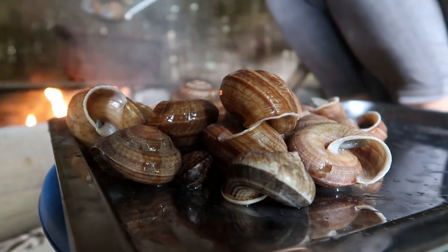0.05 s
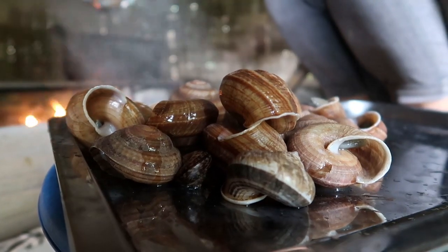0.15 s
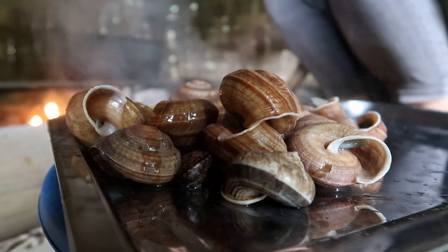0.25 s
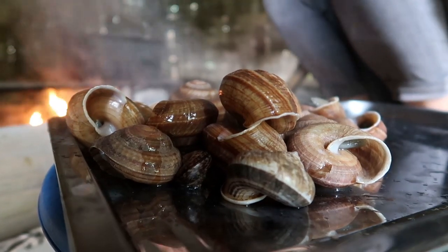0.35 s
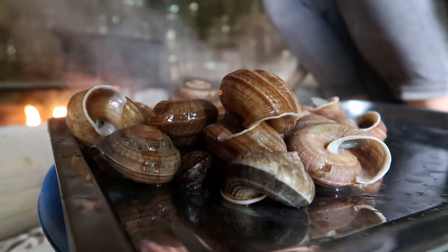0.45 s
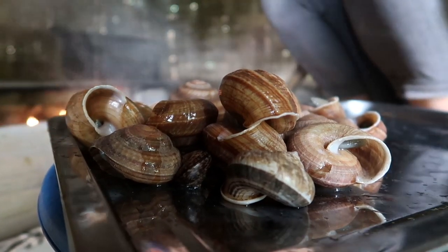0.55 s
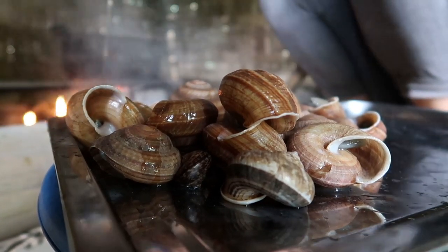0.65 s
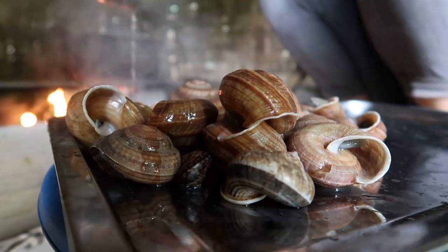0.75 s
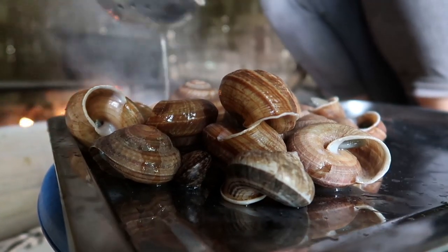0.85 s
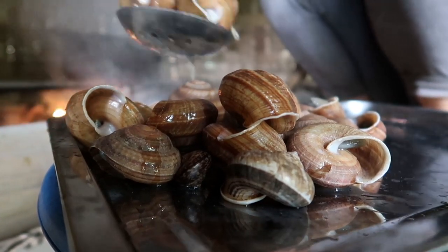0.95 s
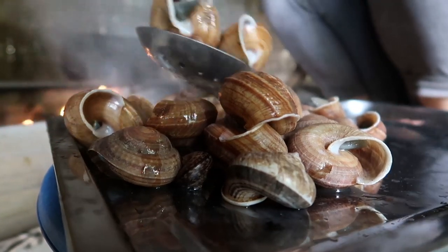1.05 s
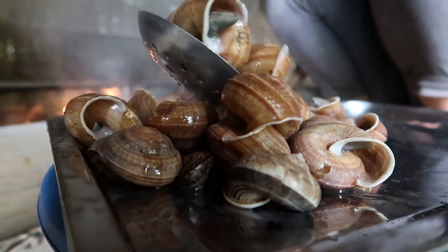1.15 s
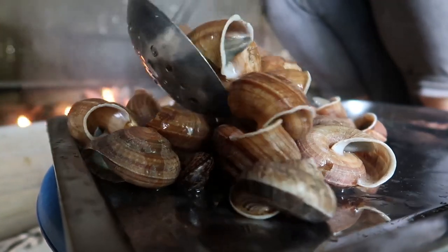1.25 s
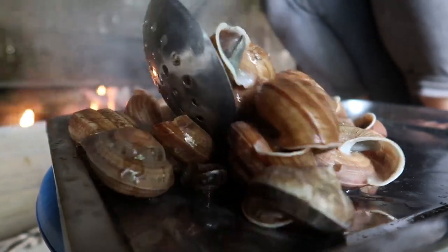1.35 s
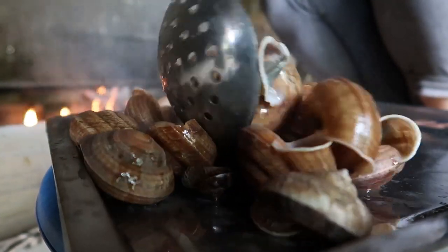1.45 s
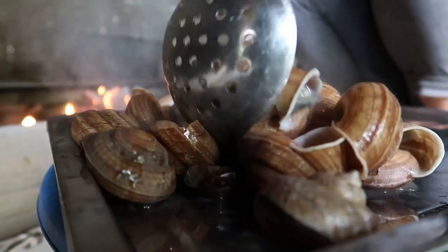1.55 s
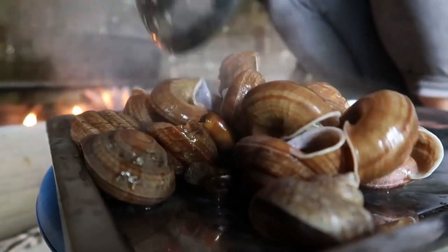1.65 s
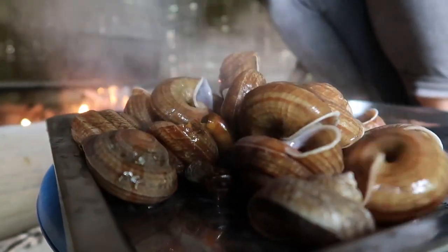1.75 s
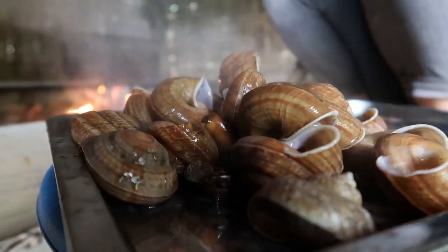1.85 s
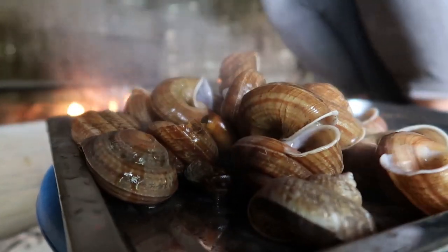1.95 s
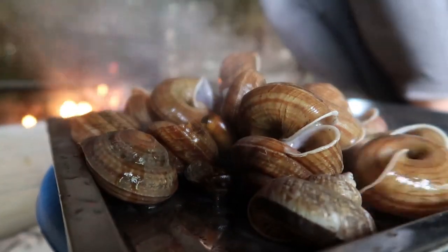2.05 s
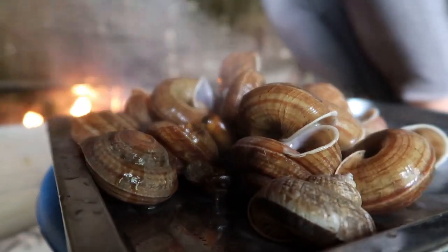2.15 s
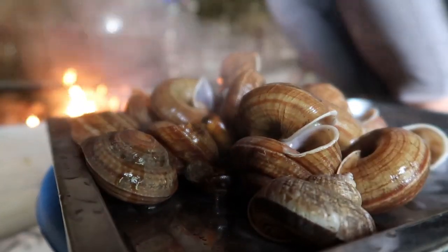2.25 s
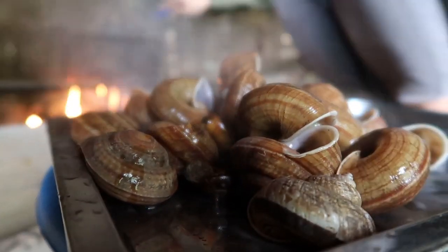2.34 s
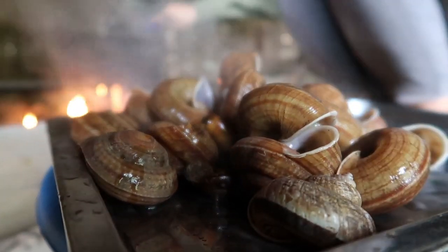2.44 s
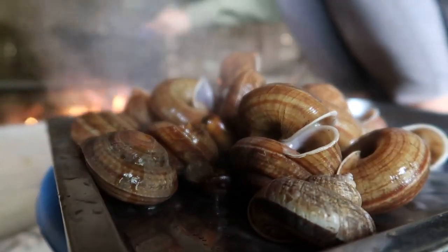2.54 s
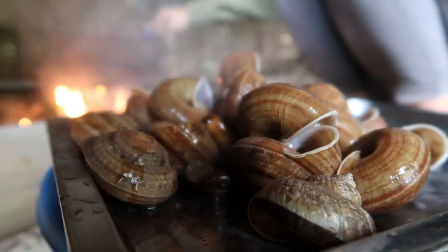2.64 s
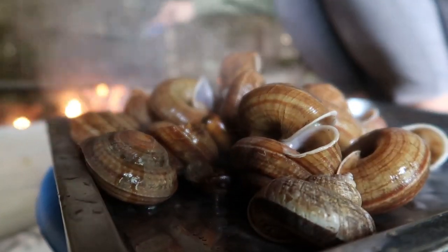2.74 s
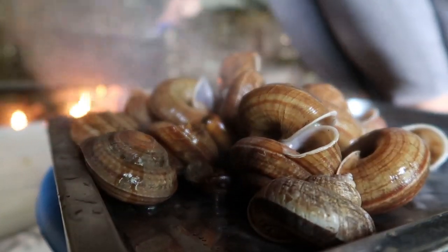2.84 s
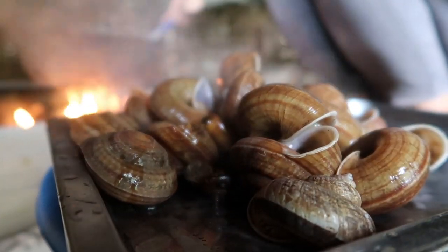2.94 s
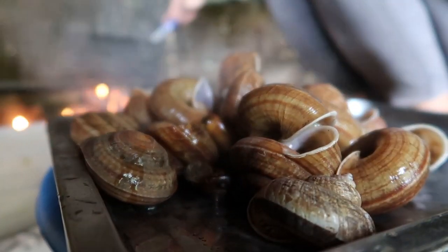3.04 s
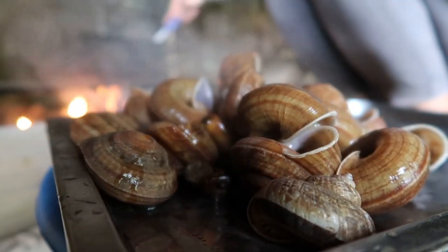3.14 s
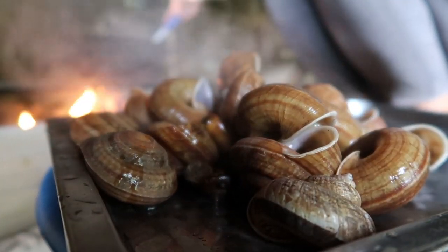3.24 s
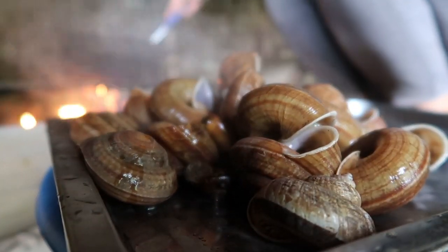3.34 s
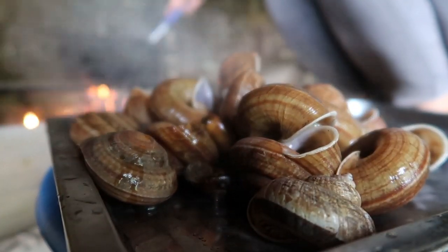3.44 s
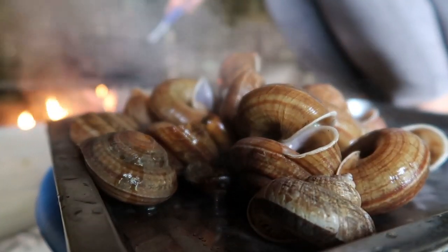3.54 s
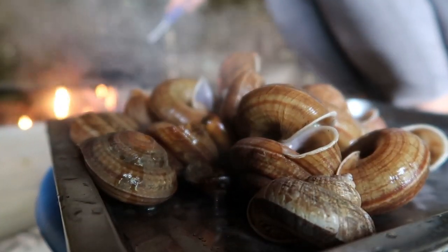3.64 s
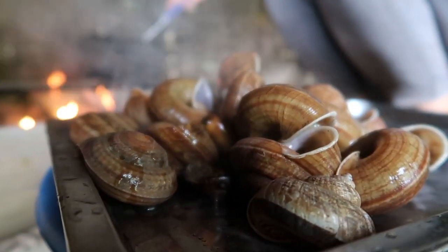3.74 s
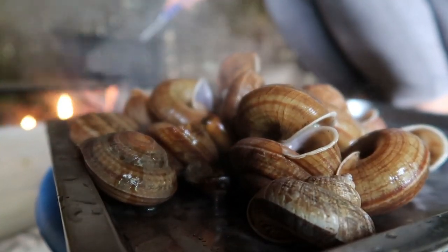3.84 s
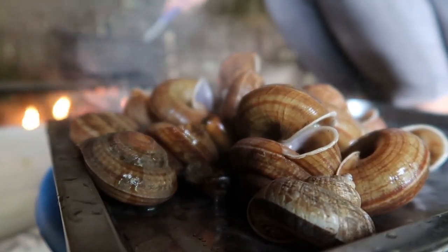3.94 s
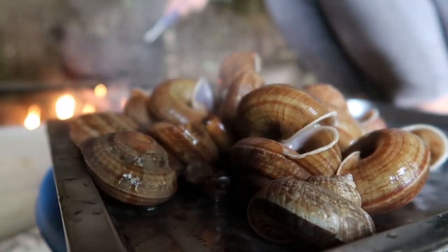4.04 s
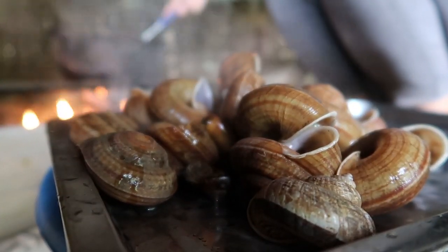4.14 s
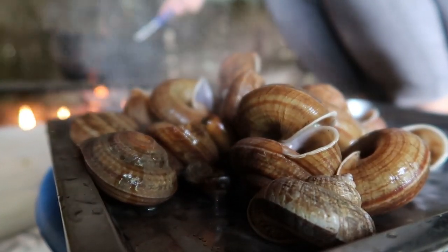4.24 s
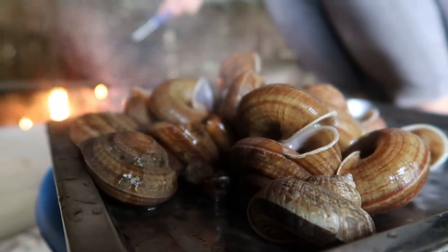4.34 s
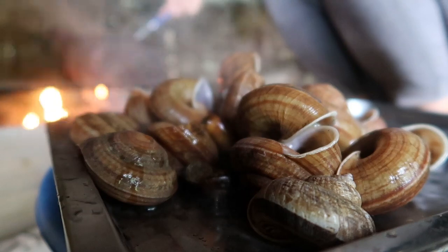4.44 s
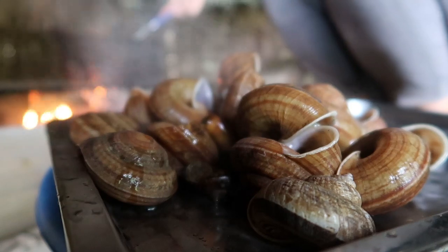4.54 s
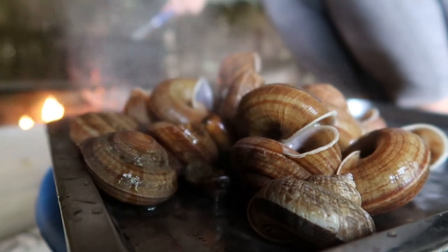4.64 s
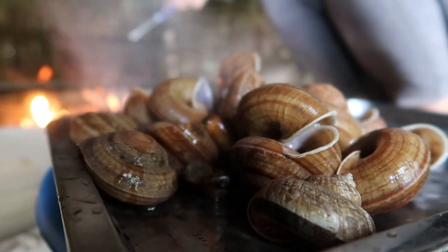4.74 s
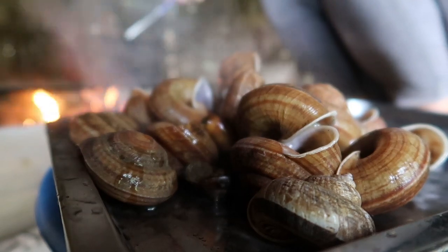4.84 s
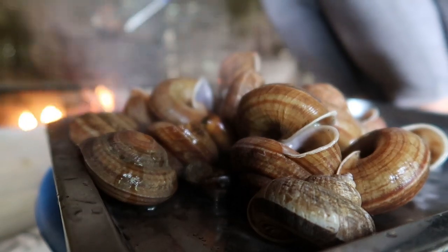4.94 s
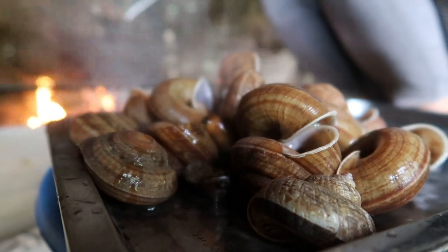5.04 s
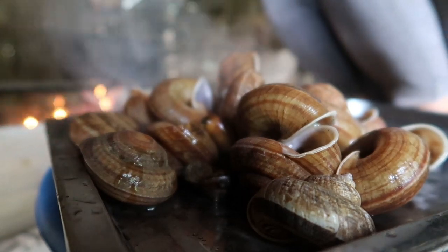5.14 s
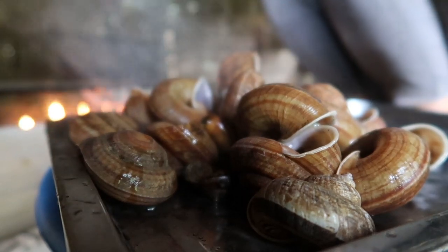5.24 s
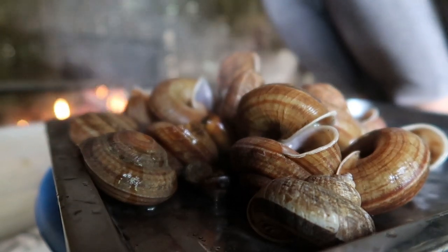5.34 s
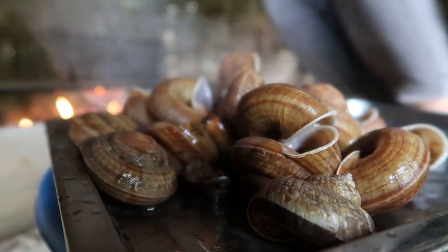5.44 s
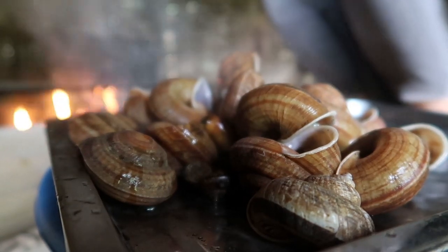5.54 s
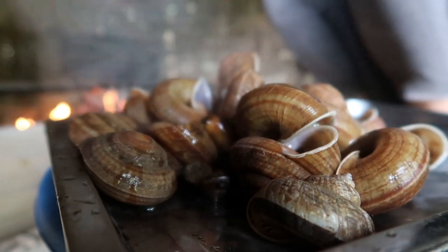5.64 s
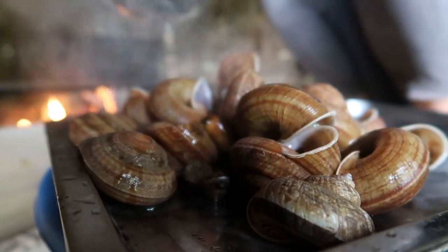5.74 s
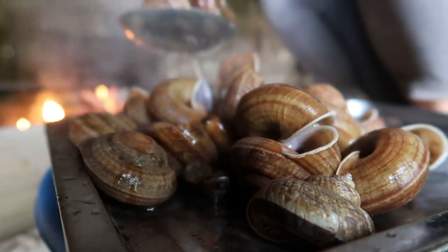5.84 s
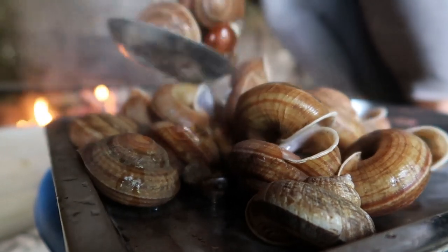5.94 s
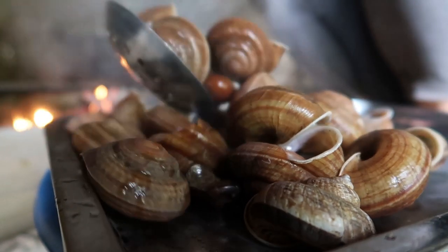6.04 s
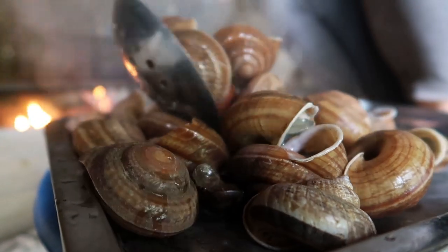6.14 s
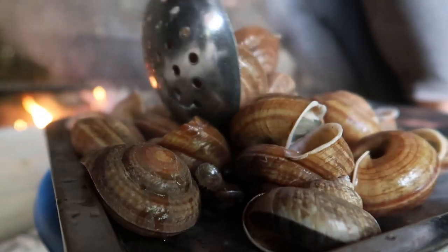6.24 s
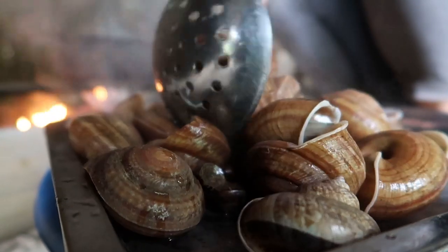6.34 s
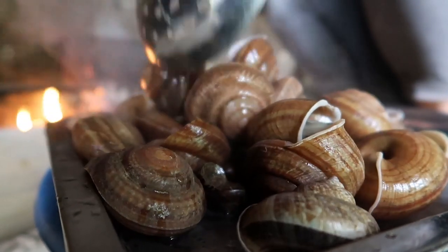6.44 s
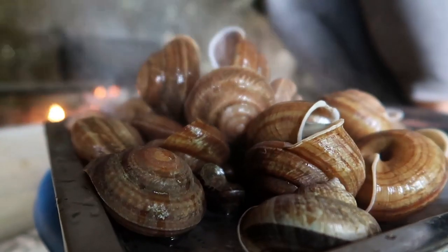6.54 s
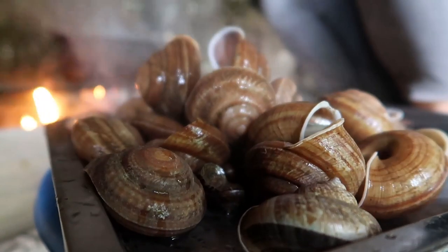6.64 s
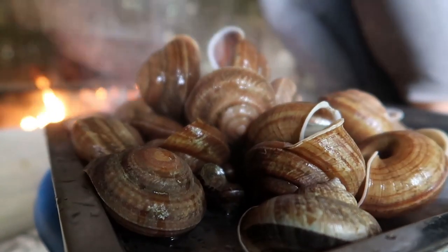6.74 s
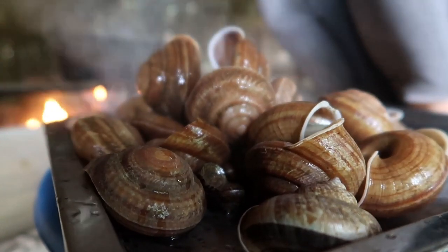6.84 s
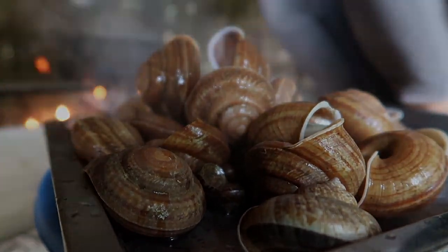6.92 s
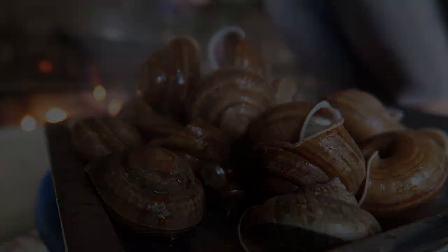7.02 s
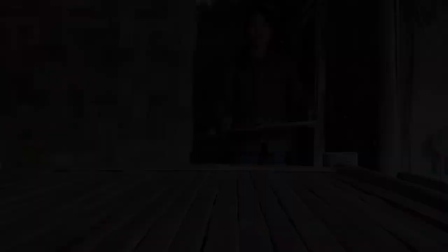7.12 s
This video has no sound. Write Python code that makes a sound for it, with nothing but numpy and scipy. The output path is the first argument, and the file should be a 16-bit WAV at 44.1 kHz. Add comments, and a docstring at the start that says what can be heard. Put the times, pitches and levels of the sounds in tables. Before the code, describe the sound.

Shells tumble from a metal spoon onto a tray with thumps and hollow clicks, twice, separated by distant pot stirring amid insect drone.

```python
"""Two clattering pours of cooked snail shells on a steel tray close by, with spoon work in a pot between them.
Each pour opens with a hard thump; shells knock, click and ring hollow, then settle in sparse rolls.
Further off the spoon knocks, scrapes and stirs; all round, filtered noise and wavering sines buzz as insects.
Contacts are noise bursts through resonances plus damped sines; nearby walls answer them.
An automatic gain ducks everything after loud sound, so the insects sink and creep back."""
import sys
import numpy as np
from scipy import signal
from scipy.fft import rfft, irfft, next_fast_len
from scipy.io import wavfile
from scipy.ndimage import uniform_filter1d, map_coordinates

SR = 44100
rng = np.random.default_rng(int(sys.argv[2]) if len(sys.argv) > 2 else 0)


def unload_wav(signal):
    """Save mono or channel-first audio to the path in sys.argv[1] as 16-bit WAV at rate SR, clipped to [-1, 1]."""
    wavfile.write(
        sys.argv[1],
        SR,
        np.round(np.clip(np.atleast_2d(signal).T, -1, 1) * 32767).astype(np.int16),
    )


N = 316701
SIZE = 2 * next_fast_len(N // 2 + SR // 4)
HZ = np.fft.rfftfreq(SIZE, 1 / SR)

# hard single strikes on the tray, by the loaded spoon or one shell; levels are relative:
# t/s, thump/dB, snap/dB, crack/dB, crack f/Hz, struck shell's crack/dB, its f/Hz, lean to the left (side/mid)
HARD_STRIKES = [(1.139, 1, -19, -9, 2360, -13, 3580, -0.56), (1.756, -7, -15, 1.5, 3070, 3, 3210, -0.098),
                (1.824, -2, -8.5, -11, 2730, -2, 1220, -0.61), (2.2604, -21, -2, 0.5, 1560, -6, 3020, -1.2),
                (5.9898, -1.5, -2, 6, 2770, -11, 886, 0.099)]
# air in a shell's mouth: multiple of the note, relative level/dB, t60/s
MOUTH_MODES = [(1, 0.5, 0.036), (1.47, -15, 0.037)]
# wall of a shell: multiple of the pitch, relative level/dB, t60/s
WALL_MODES = [(.8, -12.5, 0.024), (1, 2.5, 0.02), (1.33, -11, 0.018), (1.9, -40, 0.014)]


def amp(db):
    """Decibels to gain."""
    return 10 ** (np.asarray(db) / 20)


def unit(x):
    """Each row at rms 1."""
    return x / np.sqrt(np.mean(x ** 2, axis=-1, keepdims=True) + 1e-20)


def along(points, hz):
    """Read (Hz, value) points on a log frequency axis."""
    f, v = np.transpose(points)
    return np.interp(np.log(hz + 1), np.log(f + 1), v)


def fade(t, t60):
    """A decay of 60 dB in t60 seconds."""
    return np.exp(-np.log(1000) * t / np.maximum(t60, 1e-3))


def wobble(rate):
    """A smooth random curve, rate knots a second."""
    knots = rng.standard_normal(int(N * rate / SR) + 4)
    return map_coordinates(knots, [np.arange(N) * rate / SR])


def add(track, s, sound):
    """Mix a sound into a track at time s."""
    part = track[..., round(s * SR):][..., :sound.shape[-1]]
    part += sound[..., :part.shape[-1]]


def filtered(x, response):
    """A signal through a frequency response."""
    return irfft(rfft(x, SIZE) * response, SIZE)[..., :N]


def colour(points):
    """Causal minimum-phase response with the given spectrum, a dull top octave and a power gain of 1."""
    top = 1 / (1 + (HZ / 10500) ** 8)
    cepstrum = irfft(np.log(unit(top * amp(along(points, HZ)))))
    cepstrum[1:SIZE // 2] *= 2
    cepstrum[SIZE // 2 + 1:] = 0
    return np.exp(rfft(cepstrum))


def body(modes, soft_hz):
    """Resonances (Hz, width Hz, dB) at a power gain of 1; a contact's softness dulls the treble."""
    h = 0
    for k, (hz, width, db) in enumerate(modes):
        resonance = 1j * HZ * width / (hz * hz - HZ ** 2 + 1j * HZ * width)
        h = h + (-1) ** k * amp(db) * resonance
    # small objects radiate little bass
    h = h / (1 + 1j * HZ / soft_hz) ** 2 * 1j * HZ / (90 + 1j * HZ)
    return h / np.sqrt(np.mean(abs(h) ** 2))


def ringing(modes, pitch=1):
    """Damped modes, (Hz or multiple of the pitch, dB, t60 s), struck once."""
    t = np.arange(SR // 5) / SR
    return sum(amp(db) * np.sin(2 * np.pi * f * pitch * t) * fade(t, t60) for f, db, t60 in modes)


def notes(modes, times, pitches_hz, levels_db):
    """The same modes struck at each time, at that object's own pitch and a random lean."""
    out = np.zeros((2, N))
    for s, hz, db in zip(times, pitches_hz, levels_db):
        lean = np.array([[1], [rng.uniform(-1.95, 1)]])
        add(out, s, amp(db) * lean * ringing(modes, hz))
    return out


def rounded(x):
    """A shell is too small to radiate bass, and the contact time softens its edge."""
    contact_hz = 6000
    return filtered(x, (1j * HZ / (220 + 1j * HZ)) ** 2 / (1 + (HZ / contact_hz) ** 4))


def blows(times, levels_db, t60, clean, rebounds_per_s):
    """Mid and side force of contacts: a clean tap (this share of the energy), then fading rebounds."""
    force, t = np.zeros((2, N)), np.arange(SR // 5) / SR
    share = np.clip(clean, 0, 1)
    for s, db in zip(times, levels_db):
        lean = np.array([[1], [rng.uniform(-1.5, 1.3)]])
        tap = unit(1.0 * (t == 0)) * lean
        hits = rng.standard_normal((2, len(t))) * (rng.random(len(t)) < rebounds_per_s / SR)
        rebounds = unit(hits * fade(t, t60))
        add(force, s, amp(db - 14) * (np.sqrt(share) * tap + np.sqrt(1 - share) * rebounds))
    return force


def jostle(rate, scatter_db, chatter_t60, clean):
    """Mid and side force of many random contacts a second: clean taps (this share) and short chatter."""
    sizes = (rng.random(N) < rate / SR) * amp(scatter_db * np.clip(rng.standard_normal(N), -2, 2))
    power = signal.fftconvolve(sizes ** 2, fade(np.arange(SR // 20) / SR, chatter_t60) ** 2)[:N]
    taps = unit(sizes * rng.choice([-1, 1], (2, N)))
    chatter = unit(np.sqrt(abs(power)) * rng.standard_normal((2, N)))
    share = np.clip(clean, 0, 1)
    return np.sqrt(share) * taps + np.sqrt(1 - share) * chatter


def strokes(rows, rise_s, sag_db_per_s, t60):
    """Gain of (start, length, dB) movements: each rises, sags while it lasts, then dies away."""
    power = np.zeros(N)
    for start, length, db in rows:
        t = np.maximum(np.arange(N) / SR - start, 0)
        held = amp(db - sag_db_per_s * np.minimum(t, length))
        power += (np.minimum(t / rise_s, 1) * held * fade(np.maximum(t - length, 0), t60)) ** 2
    return np.sqrt(power)


def rattling(envelope, rate, scatter_db):
    """Times and levels of stray clinks that follow an envelope."""
    at, size = rng.integers(N, size=int(rate * N / SR)), rng.standard_normal(N)
    at = at[envelope[at] > 1e-4]
    return at / SR, 20 * np.log10(envelope[at]) + scatter_db * np.clip(size[at], -2, 2)


def clinks(times, levels_db, centre_hz, spread, ring_t60, count=4):
    """Each clink has a few short modes of its own, scattered about a centre pitch and decay."""
    out, t = np.zeros((2, N)), np.arange(SR // 10) / SR
    for s, db in zip(times, levels_db):
        z = np.clip(rng.standard_normal((4, count, 1)), -2, 2)
        tones = np.sin(2 * np.pi * centre_hz * np.exp(spread * z[0]) * t)
        modes = tones * fade(t, ring_t60 * np.exp(z[1] / 4))
        add(out, s, amp(db) * unit(z[2:, :, 0]) @ modes)
    return out


def air():
    """Low outdoor rumble: filtered noise that swells a little."""
    # f/Hz, relative level/dB per Hz
    rumble_tone = [(20, -24), (45, -1.5), (70, 0.5), (118, 2.5), (200, -2), (300, -4), (450, -6),
                   (720, -11.5), (1200, -14.5), (1500, -11.5), (3000, -78)]
    rumble = unit(filtered(rng.standard_normal((2, N)), colour(rumble_tone)))
    return amp(-49.5 + 2.5 * wobble(3.86)) * rumble


def insects():
    """A far chorus merges into two noise bands, each with its own flutter; near ones hold a wavering pitch."""
    # spectrum of the far chorus: f/Hz, relative level/dB per Hz
    buzz_tone = [(900, -36), (1300, -20), (1550, -2.5), (1760, 1), (2020, -10.5), (2320, -8), (2750, -8),
                 (3150, 0.5), (3400, 1.5), (3720, -5.5), (3900, -8), (4450, -12), (4950, -10), (5230, -10),
                 (5420, -14), (6550, -19), (7300, -27), (9500, -29.5), (13000, -42.5)]
    # swell of the far chorus: t/s, level/dB
    chorus_level = [(0, -37), (1.1, -37), (3, -37.5), (4.5, -38.5), (7.2, -39)]
    # near insects: f/Hz, level/dB
    shrill_notes = [(1728, -52), (3333, -46.5), (3577, -50.5), (3741, -49), (4946, -67), (5190, -61)]
    waver_hz, waver_rate = 22, 160  # pitch jitter and its random knots per second
    tremolo_db, tremolo_rate = 3, 60  # level jitter and its random knots per second
    low = 1 / (1 + (HZ / 2300) ** 12)
    chorus = np.zeros((2, N))
    for band in (low, 1 - low):
        flutter = amp(0.14 * wobble(2.92) + 1.3 * wobble(55) + 0.34 * wobble(300))
        noise = unit(rng.standard_normal((2, N)) * flutter)
        chorus += filtered(noise, colour(buzz_tone) * np.sqrt(band))
    out = amp(np.interp(np.arange(N) / SR, *np.transpose(chorus_level))) * unit(chorus)
    for hz, db in shrill_notes:
        phase = 2 * np.pi * np.cumsum(hz + waver_hz * wobble(waver_rate)) / SR
        out[0] += amp(db + tremolo_db * wobble(tremolo_rate)) * np.sin(phase)
    return out


def pot():
    """The spoon knocks, scrapes and stirs in the pot; its belly booms and the shells answer with hollow notes."""
    # spoon knocks, relative levels: t/s, low knock/dB, scrape/dB, hollow note f/Hz, note/dB, shell wall f/Hz
    pot_knocks = [(0.236, -42.5, -48, 1150, -36, 1620), (0.592, -44.5, -58, 694, -40, 1620),
                  (2.117, -34, -33, 1320, -29, 1650), (2.128, -30.5, -33, 836, -24.5, 1730),
                  (2.565, -27, -26.5, 1060, -22.5, 2690), (2.681, -20.5, -31, 895, -13.5, 2560),
                  (2.691, -38, -26, 486, -18.5, 2560), (2.781, -29.5, -52, 944, -30, 2080),
                  (2.826, -33.5, -36, 894, -35, 2100), (2.901, -33, -34, 936, -24, 2090),
                  (2.9399, -32, -27, 1110, -34, 1890), (2.9597, -33, -30, 840, -25, 2080),
                  (2.9699, -31, -29.5, 1175, -21, 2080), (3.004, -30.5, -33, 1140, -23, 1620),
                  (3.0156, -39, -35, 1155, -22, 3445), (3.043, -43, -41, 1150, -24.5, 2080),
                  (3.089, -36, -35, 880, -34, 1730), (3.157, -38, -33.5, 1140, -29, 1625),
                  (3.1689, -32, -36, 1200, -25, 1720), (3.177, -36, -37, 1150, -21, 1620),
                  (3.236, -40, -38, 1160, -25, 1800), (3.2657, -41, -31, 1230, -26, 1710),
                  (3.272, -36, -33, 930, -21, 2100), (3.295, -30, -32, 1150, -25, 2100),
                  (3.3075, -35, -26.5, 1135, -25, 1620), (3.317, -30.5, -30, 1126, -36, 2520),
                  (3.327, -40, -32, 1125, -25, 2080), (3.464, -47, -47, 1210, -30, 1600),
                  (3.846, -30.5, -35, 467, -34, 1710), (3.865, -28.5, -23, 733, -17.5, 3200),
                  (3.872, -31.5, -29, 480, -22, 1610), (3.892, -44, -28, 850, -37, 2400)]
    # bumps that set the pot's belly ringing: t/s, level/dB
    pot_bumps = [(0.592, -34.5), (2.128, -35), (2.565, -23.5), (2.681, -19.5), (2.781, -34), (3.171, -37),
                 (3.316, -36)]
    # belly ring: f/Hz, relative level/dB, t60/s
    belly_modes = [(174, -0.5, 0.1), (235, 0, 0.16), (480, -1, 0.057), (584, -6.5, 0.12), (930, -9, 0.044),
                   (1160, -20, .06), (2584, -27, .066)]
    # pot resonances: f/Hz, width/Hz, relative level/dB
    pot_modes = [(174, 72, -1), (250, 74, 4.5), (394, 41, 3), (466, 180, 0.5), (715, 114, -2),
                 (875, 200, -1.5), (1176, 33, 3.5), (1515, 61, -2.5), (2030, 310, -18), (3100, 350, -4)]
    # scrape spectrum: f/Hz, relative level/dB per Hz
    scrape_tone = [(400, -29), (1200, -3.5), (2200, 0), (3100, -2.5), (4200, -9), (6000, -14.5),
                   (8500, -34.5)]
    # shells grate along the pot wall: start t/s, length/s, relative level/dB, grating f/Hz
    wall_scrapes = [(2.94, 0.04, -42, 2000), (3.262, 0.053, -36, 1180), (3.74, 0.015, -44, 2150),
                    (3.883, 0.02, -34.5, 2120), (3.904, 0.017, -36.5, 2400)]
    # stirring: t/s, relative level/dB; silent outside
    stir_level = [(2.72, -56), (2.79, -42), (2.92, -40.5), (3.3, -37.5), (3.39, -46.5), (3.5, -40),
                  (3.64, -49), (3.9, -43), (4.5, -62)]
    s, knock_db, scrape_db, mouth_hz, mouth_db, wall_hz = np.transpose(pot_knocks)
    bump_s, bump_db = np.transpose(pot_bumps)
    chatter_t60, clean = 0.083, 0.4  # s after each knock; share of energy in its first tap

    grit = jostle(rate=220, scatter_db=2, chatter_t60=0.05, clean=.3)
    stir_s, stir_db = np.transpose(stir_level)
    stir = amp(np.interp(np.arange(N) / SR, stir_s, stir_db, left=-np.inf, right=-np.inf))
    grate, dragging = 0, 0
    for start, length, db, hz in wall_scrapes:
        drag = strokes([(start, length, db)], rise_s=0.0071, sag_db_per_s=49, t60=0.054)
        dragging = dragging + drag
        grate = grate + filtered(drag * grit, body([(hz, 340, 0)], soft_hz=4970))

    knock = blows(s, knock_db + 1, chatter_t60, clean, rebounds_per_s=700)
    knock += amp(-1.5) * stir * grit
    scrape = blows(s, scrape_db - 3, chatter_t60, clean=0.07, rebounds_per_s=3000)
    scrape += (amp(-2) * stir + amp(-8) * dragging) * grit
    # shells in the spoon answer each knock, and bump together as they are stirred
    hollow = notes(MOUTH_MODES, s, mouth_hz, mouth_db)
    hollow += notes(WALL_MODES, s, wall_hz, scrape_db + 3)
    boom = notes(belly_modes, bump_s, np.ones(len(bump_s)), bump_db)
    stray = rattling(stir, rate=60, scatter_db=-1.5)
    bumps = clinks(*stray, centre_hz=1112, spread=0.147, ring_t60=0.059, count=2)
    clacks = rounded(hollow + boom + amp(-4.5) * bumps)
    return filtered(knock, body(pot_modes, soft_hz=2960)) + filtered(scrape, colour(scrape_tone)) + grate + clacks


def spoon():
    """The emptying spoon grazes the heap and rings thinly; each touch favours other modes."""
    # rim touches: t/s, relative level/dB
    rim_tinks = [(1.309, -39), (1.669, -37.5), (6.331, -41), (6.478, -35.5), (6.525, -33), (6.538, -35),
                 (6.554, -43)]
    # spoon steel: f/Hz, relative level/dB, t60/s
    spoon_modes = [(5430, 2, .04), (6460, -0.5, 0.074), (7100, -5, 0.046), (7920, 1.5, 0.05),
                   (9150, -4, 0.049), (10400, -10, 0.08), (11000, -22, .05)]
    out = np.zeros((2, N))
    for s, db in rim_tinks:
        for mode in spoon_modes:
            gain = amp(db + rng.normal(0, 2.7, (2, 1))) * rng.choice([-1, 1], (2, 1))
            add(out, s, gain * ringing([mode]))
    return out


def strikes():
    """A hard strike cracks dryly in the shell wall and thumps the damped tray; stray shells ring bare steel."""
    # loaded tray: f/Hz, relative level/dB, t60/s
    thump_modes = [(243, -12, 0.094), (383.4, 0.5, 0.043), (673, -14, 0.059), (920, -4, 0.034)]
    # shell wall: multiple of the pitch, relative level/dB, t60/s
    crack_modes = [(.82, -12.5, 0.022), (1, -8, 0.025), (1.5, -16.5, 0.0037), (2.45, -36, 0.0057)]
    # snap spectrum: f/Hz, relative level/dB per Hz
    snap_tone = [(500, -18.5), (1500, 5.5), (2400, 0), (3000, 4), (5500, -2), (7000, -17), (8500, -13),
                 (12500, -31)]
    # a shell falls off the heap and bounces on bare steel: t/s, relative level/dB
    sheet_hits = [(1.827, -17), (1.8766, -26)]
    # bare steel: f/Hz, relative level/dB, t60/s
    sheet_modes = [(460, -8, .088), (1190, 6.5, .092), (2256, 0, .07), (2805, -8, .11), (3100, -3, .1),
                   (3640, 3, .075)]
    out, snap, t = np.zeros((2, N)), np.zeros((2, N)), np.arange(SR // 5) / SR
    for s, thump_db, snap_db, crack_db, hz, struck_db, struck_hz, lean in HARD_STRIKES:
        cracks = amp(crack_db) * ringing(crack_modes, hz) + amp(struck_db) * ringing(crack_modes, struck_hz)
        thump = amp(thump_db) * ringing(thump_modes)
        add(out, s, np.array([[1], [lean]]) * (thump + cracks))
        add(snap, s, amp(snap_db) * rng.standard_normal((2, len(t))) * fade(t, 0.0092))
    for s, db in sheet_hits:
        add(out[0], s, amp(db) * ringing(sheet_modes))
    # the tray radiates little bass, and the contact time rounds the sharpest edge
    radiation = (1j * HZ / (110 + 1j * HZ)) ** 3 / (1 + 1j * HZ / 9000) ** 3
    return filtered(out, radiation) + filtered(snap, colour(snap_tone))


def shells():
    """Single contacts and a dense rattle click in the shells and drum on the tray; faster flow is brighter."""
    # shells dropping on the heap, relative levels:
    # t/s, tray knock/dB, shell click/dB, wall f/Hz, hollow mouth f/Hz, hard edge/dB
    contacts = [(1.1455, -9.5, -16, 3430, 905, -24), (1.1509, -10.5, -15, 2730, 790, -24),
                (1.1581, -14, -16, 2850, 730, -15), (1.1751, -15, -16, 1744, 775, -28),
                (1.1804, -15, -21, 2730, 754, -17), (1.1903, -14, -23, 2010, 785, -27),
                (1.1999, -16, -21, 3440, 730, -33), (1.213, -21, -19, 3570, 1173, -32),
                (1.2191, -18, -22, 2400, 930, -33), (1.2369, -17, -20.5, 2910, 850, -32),
                (1.2522, -16.5, -18, 2690, 790, -33), (1.2627, -16.5, -16.5, 1520, 740, -23),
                (1.2859, -27, -18, 1520, 970, -40), (1.3074, -25, -24, 1430, 785, -20.5),
                (1.3176, -33, -17, 1500, 1200, -35), (1.3427, -18, -16, 1610, 1230, -30),
                (1.372, -11.5, -16.5, 3300, 1235, -19), (1.3799, -14.5, -17, 3400, 1160, -30),
                (1.4008, -17, -16, 3570, 920, -33), (1.4274, -10.5, -22, 3100, 1205, -24),
                (1.4373, -18, -15.5, 3250, 794, -18), (1.4523, -18, -16, 1620, 1280, -23),
                (1.4655, -16, -22, 1670, 935, -38), (1.4983, -14, -19, 1540, 1180, -22),
                (1.5097, -19, -15, 1700, 1160, -31), (1.5185, -21, -15, 1600, 940, -28),
                (1.5229, -25, -12, 1490, 1380, -32), (1.5623, -22.5, -19.5, 1700, 794, -44),
                (1.588, -30, -20.5, 1630, 785, -47), (1.6076, -30, -26, 1711, 753, -46),
                (1.6137, -32, -28, 1570, 1170, -46), (1.631, -28, -27, 1510, 1000, -47),
                (1.6446, -21, -15.5, 1590, 940, -42), (1.6605, -25.5, -21, 1810, 790, -44),
                (1.6742, -27, -26, 1620, 872, -44), (1.6877, -29, -22, 1620, 975, -52),
                (1.6977, -21.5, -20, 1790, 1030, -46), (1.7098, -19, -19, 1815, 895, -28),
                (1.7229, -26, -23, 3150, 750, -41), (1.7383, -22, -21.5, 3100, 1030, -36),
                (1.7875, -19, -19.5, 1780, 930, -24.5), (1.8339, -11, -12, 3170, 786, -24),
                (1.8705, -17, -21, 1760, 1130, -22), (1.8761, -10, -23, 1470, 915, -24),
                (1.9312, -32, -23.5, 1440, 644, -42), (1.9392, -25, -27.5, 1840, 637, -36),
                (2.208, -37, -47, 1700, 860, -62), (2.232, -35, -40, 1700, 860, -60),
                (2.332, -38, -42, 1600, 890, -58), (5.9955, -6.5, -12.5, 3600, 766, -16),
                (6.0519, -21, -25, 2770, 780, -24), (6.0871, -11.5, -24, 1770, 1175, -16),
                (6.0956, -14.5, -22, 3330, 770, -26), (6.1071, -14, -15, 2920, 780, -19),
                (6.1198, -16.5, -18, 2485, 794, -32), (6.1475, -17, -19, 3750, 920, -21),
                (6.1744, -13, -16, 1744, 1310, -34), (6.186, -16, -18, 3220, 936, -22),
                (6.2374, -26, -23, 1710, 1110, -38), (6.2765, -18, -16.5, 1700, 1210, -23),
                (6.2947, -21, -21, 3200, 1220, -21.5), (6.309, -23.5, -27, 1464, 742, -35),
                (6.3311, -24, -25, 2465, 1130, -37), (6.3379, -28, -18.5, 3310, 950, -37),
                (6.3586, -19, -20.5, 1760, 1160, -41), (6.3899, -21, -25, 1614, 1190, -42),
                (6.398, -21, -22.5, 2600, 810, -39), (6.4113, -20, -25, 3030, 865, -26),
                (6.4381, -18, -21.5, 3090, 800, -39), (6.4789, -30, -21, 2800, 1170, -29),
                (6.4929, -20, -26, 3180, 910, -24.5), (6.5079, -38, -24, 1690, 1000, -42),
                (6.5532, -20, -23, 2500, 1200, -38), (6.5681, -25, -31, 2530, 1140, -46),
                (6.5804, -33, -24, 1540, 970, -44), (6.6189, -26, -18, 1690, 850, -50),
                (6.651, -31.5, -33, 1770, 780, -55), (6.7052, -28.5, -45, 3380, 630, -52),
                (6.7262, -43, -29.5, 1550, 1150, -36)]
    # the spoon empties and shells keep tumbling: start t/s, length/s, relative level/dB
    pours = [(1.139, 0.646, -28), (5.99, .615, -27.5)]
    # part of the heap gives way: start t/s, length/s, relative level/dB
    slides = [(1.145, 0.05, -24), (1.37, 0.12, -24), (1.497, 0.038, -24.5), (1.824, 0.005, -21),
              (1.87, 0.01, -23.5), (5.995, 0.013, -21.5), (6.09, 0.046, -22), (6.15, 0.038, -21.5)]
    # a loose shell rolls on the tray: start t/s, length/s, relative level/dB
    rolls = [(1.89, 0.053, -39), (2.12, 0.059, -38), (2.2, 0.084, -34.5), (6.38, 0.04, -26),
             (6.6, 0.092, -35)]
    # the spoon's steel edge rasps over the shells: start t/s, length/s, relative level/dB
    rasps = [(1.15, 0.089, -27), (1.372, 0.056, -22), (1.826, 0.018, -22.5), (6.095, 0.034, -21.5),
             (6.18, 0.016, -22)]
    # tray resonances: f/Hz, width/Hz, relative level/dB
    tray_modes = [(212, 193, -4.5), (284.5, 116, 0.5), (367, 75, 0.5), (472, 89, -1.5), (753, 95, -3),
                  (903, 84, -0.5), (1095, 59, -4.5), (1157, 67, -1), (1800, 520, -14)]
    # spectrum of the clicks: f/Hz, relative level/dB per Hz
    shell_tone = [(200, -39.5), (700, 0), (1400, -6), (2100, -0.5), (3100, 2.5), (4000, -4.5),
                  (5200, -16.5), (6500, -19.5), (8500, -26)]
    # spectrum of shell on steel: f/Hz, relative level/dB per Hz
    edge_tone = [(1500, -38), (3200, 0), (4300, 5.5), (5400, 1), (7000, -10.5), (8700, -12), (11000, -37)]
    s, knock_db, click_db, wall_hz, mouth_hz, edge_db = np.transpose(contacts)
    struck, thump_db = np.transpose(HARD_STRIKES)[:2]

    # a pour thins out as the spoon empties
    pour = strokes(pours, rise_s=0.011, sag_db_per_s=7.5, t60=.2)
    slide = strokes(slides, rise_s=0.0063, sag_db_per_s=29, t60=0.16)
    roll = strokes(rolls, rise_s=0.0051, sag_db_per_s=31, t60=0.29)
    rasp = strokes(rasps, rise_s=0.0018, sag_db_per_s=2, t60=0.21)
    flow = np.hypot(pour, slide)
    brisk_db, brighten = -27, 0.39  # the rattle gains this many extra dB per dB of flow above a brisk one
    rattle = flow * (flow / amp(brisk_db)) ** brighten
    tumble = jostle(rate=480, scatter_db=1.5, chatter_t60=0.03, clean=.3)
    # a strike jolts the whole heap
    jolt = blows(struck, thump_db, t60=0.21, clean=0, rebounds_per_s=6000)

    drum = blows(s, knock_db - 1, t60=0.05, clean=.5, rebounds_per_s=2500)
    drum += (amp(5.5) * flow + roll) * tumble + amp(-8.5) * jolt
    click = blows(s, click_db - 9.5, t60=0.075, clean=.35, rebounds_per_s=4000)
    click += amp(4.5) * rattle * tumble + amp(-11) * jolt
    edge = blows(s, edge_db - 3, t60=0.11, clean=0.046, rebounds_per_s=5500)
    edge += rasp * jostle(rate=740, scatter_db=1.5, chatter_t60=0.089, clean=.15)

    # wet, filled shells ring only briefly, each at its own pitch; the air in the mouth adds a hollow note
    ring = notes(WALL_MODES, s, wall_hz, click_db + 6.5)
    ring += notes(MOUTH_MODES, s, mouth_hz, knock_db + 4)
    bright = rattling(rattle, rate=200, scatter_db=2)
    bright_clinks = clinks(*bright, centre_hz=2500, spread=0.31, ring_t60=0.017)
    hollow = rattling(flow, rate=97, scatter_db=-1)
    hollow_clinks = clinks(*hollow, centre_hz=1204, spread=.26, ring_t60=0.073, count=2)
    clacks = rounded(ring + bright_clinks + amp(5.5) * hollow_clinks)

    drummed = filtered(drum, body(tray_modes, soft_hz=4100))
    return drummed + filtered(click, colour(shell_tone)) + filtered(edge, colour(edge_tone)) + clacks


def yard(x):
    """A short answer from nearby walls: a decaying noise tail, the treble dying first."""
    # f/Hz, t60/s
    wall_decay = [(150, 0.44), (1000, 0.28), (3000, 0.31), (9000, 0.14)]
    hz, t, z = signal.stft(rng.standard_normal((2, SR // 2)), SR, nperseg=256)
    tail = signal.istft(z * fade(t, along(wall_decay, hz)[:, None]), SR, nperseg=256)[1]
    delayed = np.pad(tail, ((0, 0), (SR // 200, 0)))  # 5 ms
    return signal.fftconvolve(x, delayed / np.linalg.norm(tail[0]), axes=1)[:, :N]


def stereo(x, width):
    """Mid and side to left and right, the side scaled by frequency."""
    mid, side = x[0], filtered(x[1], amp(along(width, HZ)))
    return np.array([mid + side, mid - side])


def scene():
    """Tray close by, pot further off, both answered by the yard; insects and air all round."""
    # width of the handling sounds: f/Hz, side gain/dB
    near_width = [(60, -40), (110, -34), (200, -38), (380, -21), (700, -24), (1290, -15), (2380, -12),
                  (4400, -7.5), (8120, 2.5), (15000, 3)]
    # width of the background: f/Hz, side gain/dB
    far_width = [(25, -15), (60, -18), (110, -25), (200, -8.5), (380, -5), (700, -3), (1290, -9),
                 (2380, -11.5), (4400, -1), (8120, 2.5), (15000, 24.5)]
    background = insects() + air()
    further = pot()
    near = spoon() + strikes() + shells()
    handling = near + further + yard(amp(-13.5) * near + amp(-10.5) * further)
    return stereo(handling, near_width) + stereo(background, far_width)


def gain_control(x, threshold_db, depth_db, hold, release_db, size=128):
    """Loud sound turns the gain down at once; it holds, then creeps back at release_db a second."""
    power = uniform_filter1d(np.mean(x ** 2, axis=0), 8 * size, origin=4 * size - 1)[::size]
    t = np.arange(len(power)) * size / SR
    cut = np.clip(10 * np.log10(abs(power) + 1e-12) - threshold_db, 0, depth_db)
    # rows are now, columns the earlier cuts that still linger
    lingering = cut - release_db * np.maximum(t[:, None] - t - hold, 0)
    held = np.max(np.where(t[:, None] >= t, lingering, 0), axis=1)
    return x * amp(-np.interp(np.arange(N) / SR, t + size / SR, held))


def record(dry):
    """Gain control, clipping of peaks beyond full scale, a bass cut and a steep treble limit."""
    level = gain_control(dry, threshold_db=-17, depth_db=7, hold=0.43, release_db=9.5)
    bass_cut = (1j * HZ / (28 + 1j * HZ)) ** 2
    treble_limit = 1 / np.sqrt(1 + (HZ / 15500) ** 80)
    return filtered(np.clip(level, -1, 1), bass_cut * treble_limit)


dry = scene()
out = record(dry)
unload_wav(out)
```